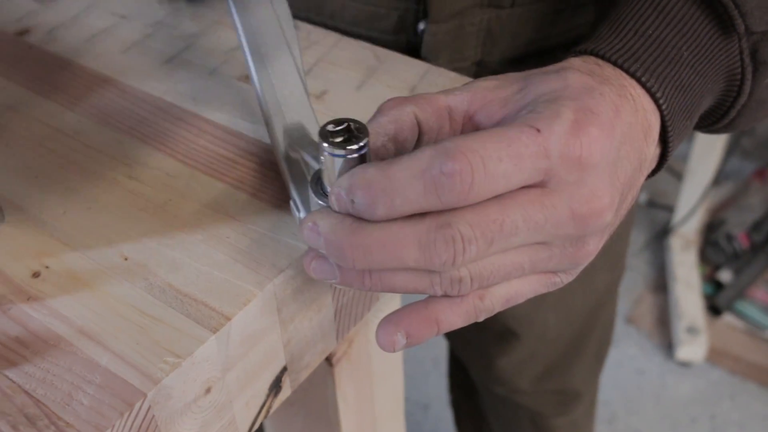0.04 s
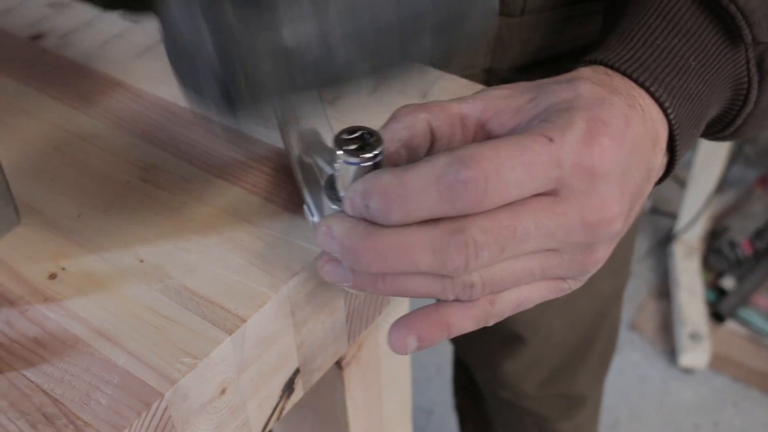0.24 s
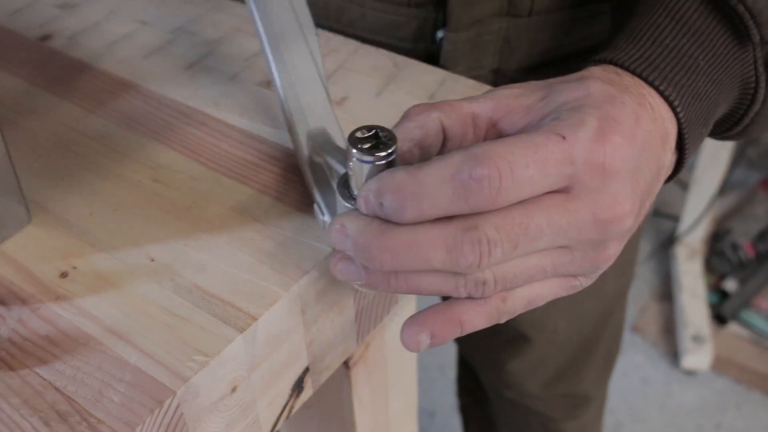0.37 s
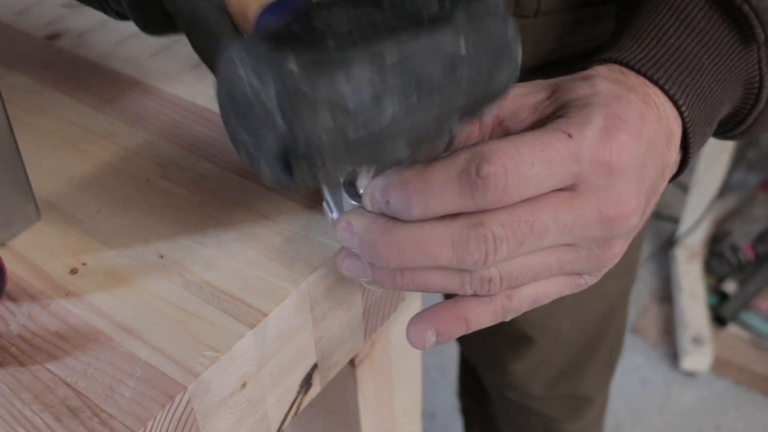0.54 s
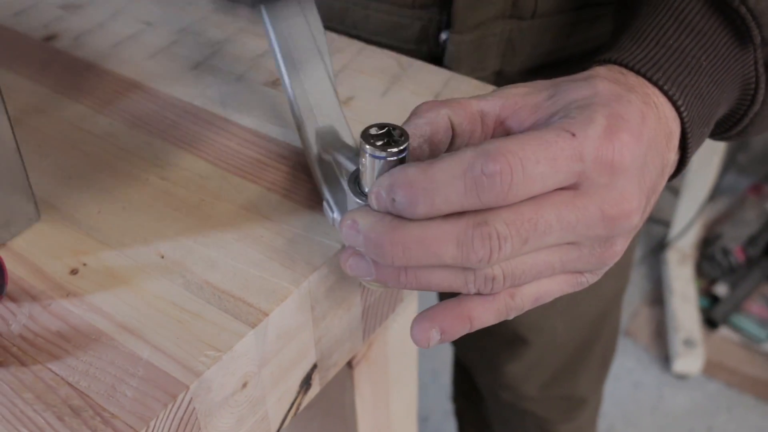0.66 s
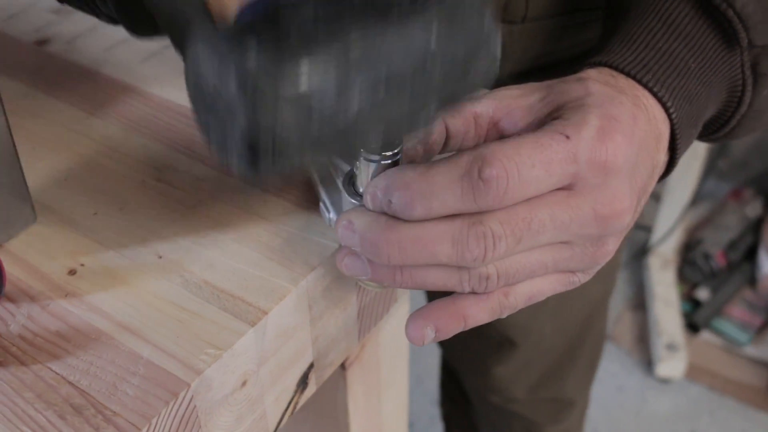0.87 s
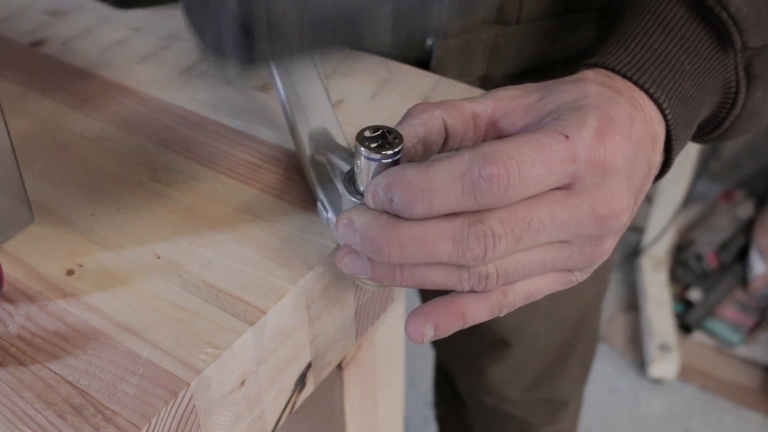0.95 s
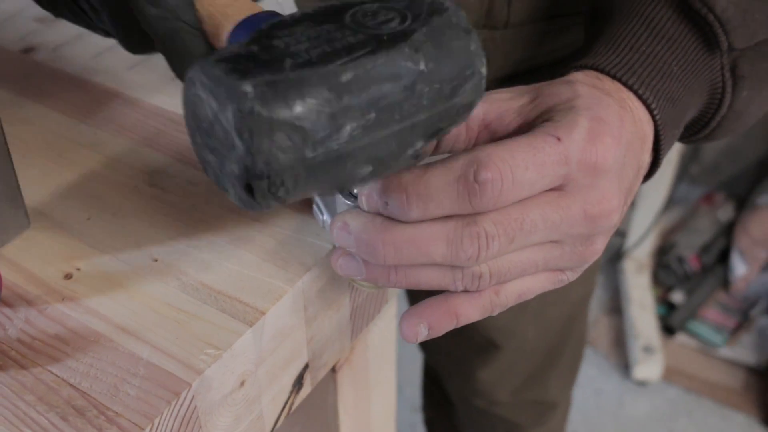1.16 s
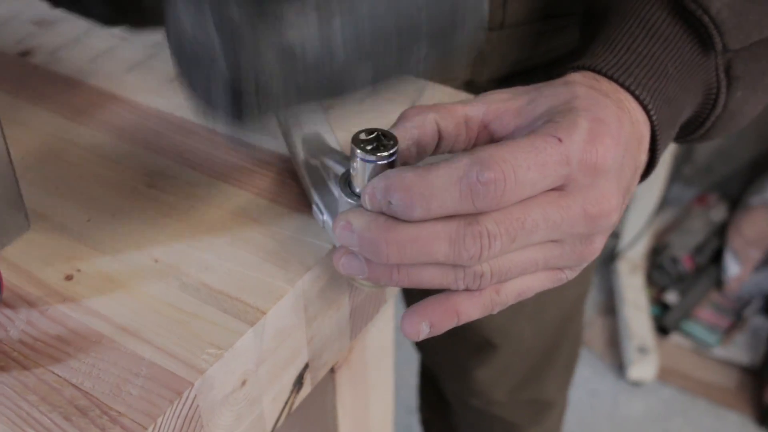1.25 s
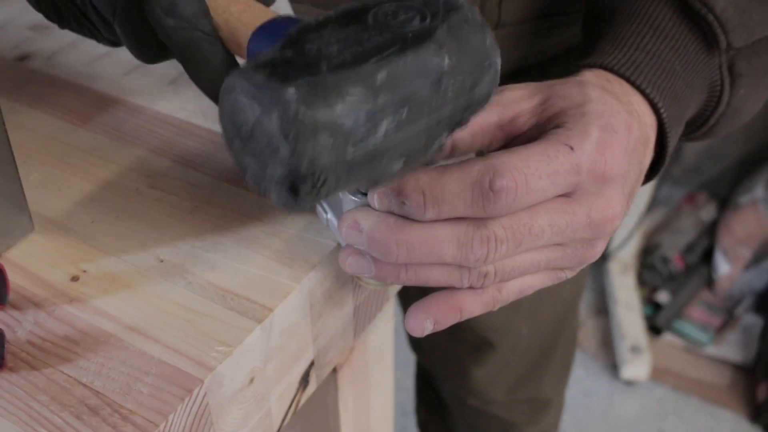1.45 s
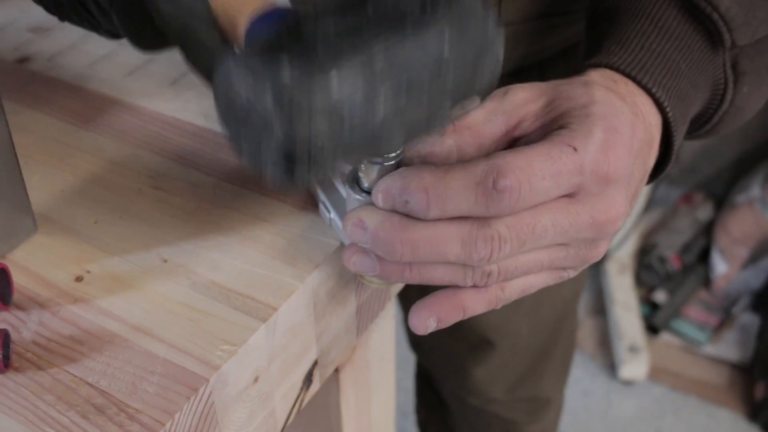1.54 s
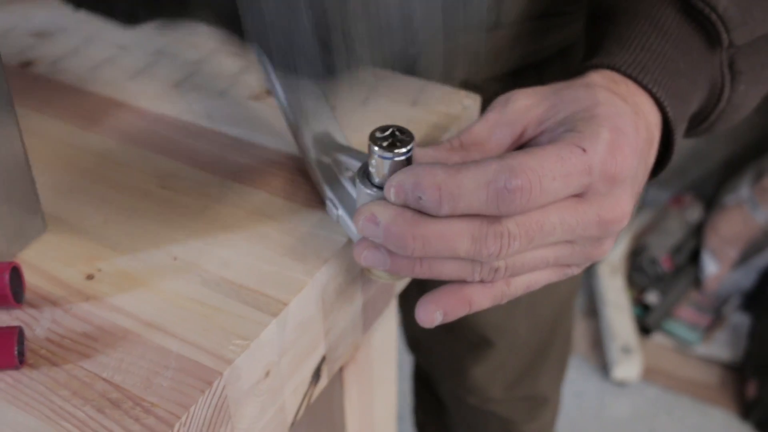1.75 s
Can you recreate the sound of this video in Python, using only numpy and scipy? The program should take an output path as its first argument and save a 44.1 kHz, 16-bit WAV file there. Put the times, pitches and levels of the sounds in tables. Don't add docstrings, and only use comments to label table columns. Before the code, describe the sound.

Rubber mallet taps on a steel socket knock a wooden workbench, with small metallic clinks, close up

```python
import sys
import numpy as np
from scipy import signal
from scipy.fft import rfft, irfft
from scipy.io import wavfile
from scipy.ndimage import map_coordinates

SR = 44100
rng = np.random.default_rng(int(sys.argv[2]) if len(sys.argv) > 2 else 0)


def unload_wav(signal):
    wavfile.write(
        sys.argv[1],
        SR,
        np.round(np.clip(np.atleast_2d(signal).T, -1, 1) * 32767).astype(np.int16),
    )


def ratio_of_db(decibels):
    return 10 ** (np.asarray(decibels, float) / 20)


N = 79380
LEAD = SR // 5
LONG = SR * 7 // 10
STEEL_RISE_S = 0.00064


def along(points, hz):
    f, value = np.transpose(points)
    return np.interp(np.log(hz + 1), np.log(f + 1), value)


def noise(points, size):
    spectrum = rfft(rng.standard_normal(size))
    x = irfft(spectrum * ratio_of_db(along(points, np.fft.rfftfreq(size, 1 / SR))), size)
    return x / x.std()


def ring(modes, rise_s, detune):
    t = np.arange(LONG) / SR
    hz, db, t60_s = np.transpose(modes)[:, :, None]
    level_luck, pitch_luck = rng.standard_normal((2, len(modes), 1))
    spread_db = 1.2
    decay = ratio_of_db(db + spread_db * level_luck - 60 * t / t60_s)
    waves = decay * np.sin(2 * np.pi * hz * (1 + detune * pitch_luck) * t)
    return -waves.sum(0) * (1 - np.exp(-t / rise_s))


def add(track, s, x):
    part = track[LEAD + round(s * SR):][:len(x)]
    part += x[:len(part)]


# (frequency [Hz], level [dB], t60 [s])
BENCH_TOP = [(116, -21, 0.45), (169.6, -18.5, .2), (257.5, 1, 0.11), (295.7, -3, 0.058), (352, -5, 0.1),
             (452.2, -4, 0.12), (611.7, -8.5, 0.14), (721.7, -6, 0.11), (890.6, -1, 0.065), (984, -2, 0.12),
             (1246, -1.5, 0.058), (1297.5, -5.5, 0.063), (1660, -6.5, 0.042), (1757, -4, 0.035)]
# (frequency [Hz], level [dB], t60 [s])
BENCH_FRAME = [(117, -36.5, 0.32), (160, -43, 0.44), (266.5, -39, .5), (352, -36.5, 0.66),
               (431.7, -34, 0.61), (538, -30, 0.51), (690, -37, 0.47), (697, -32.5, .4),
               (794.5, -28.5, 0.48), (960, -50.5, .4), (903, -24, 0.46), (996, -36.5, 1),
               (1130, -34.5, 0.23), (1196, -26, 0.37)]
# (delay [s], level [dB])
BENCH_RETURNS = [(.0035, -8.5), (.0065, -5), (.0095, -5), (.012, -7)]


def bench_knock():
    t = np.arange(LONG) / SR
    grip_s, grip_db, closing_s = 0.012, -8, 0.0023
    grip = 1 - (1 - ratio_of_db(grip_db)) * np.clip((t - grip_s) / closing_s, 0, 1)
    direct = ring(BENCH_TOP, 0.0016, 0.004)
    knock = direct.copy()
    for delay_s, db in BENCH_RETURNS:
        knock += ratio_of_db(db) * np.pad(direct, (round(delay_s * SR), 0))[:LONG]
    return grip * knock + ring(BENCH_FRAME, .01, 0.0009)


# (frequency [Hz], level [dB])
CRACK_COLOUR = [(300, -1.5), (1200, 4), (2800, 4.5), (4500, -4.5), (7500, -22), (11000, -27), (15000, -27),
                (16300, -37.5)]


def contact_crack():
    t = np.arange(LONG) / SR
    grit_db, grain = 8, 40
    bumps = rng.standard_normal(LONG // grain + 4)
    grit = ratio_of_db(grit_db * map_coordinates(bumps, [np.arange(LONG) / grain]))
    crack_t60_s, fizz_t60_s, fizz_db = 0.016, 0.04, -10.5
    fade = ratio_of_db(-60 * t / crack_t60_s) + ratio_of_db(fizz_db - 60 * t / fizz_t60_s)
    fade *= 1 - np.exp(-t / STEEL_RISE_S)
    return fade * grit * noise(CRACK_COLOUR, LONG)


def blow(bench_db, crack_db):
    return ratio_of_db(bench_db) * bench_knock() + ratio_of_db(crack_db) * contact_crack()


# (frequency [Hz], t60 [s])
SHOP_DECAY = [(100, .4), (300, 0.37), (450, 0.37), (1000, 0.43), (2200, 0.37), (4000, 0.26), (6000, 0.33),
              (14000, 0.17)]


def shop(x, air):
    level_db, delay_s = -16, 0.0049
    hz, t, z = signal.stft(air, SR, nperseg=256)
    decay = ratio_of_db(-60 * t / along(SHOP_DECAY, hz)[:, None])
    tail = signal.istft(z * decay, SR, nperseg=256)[1]
    late = np.pad(x, (round(delay_s * SR), 0))
    return ratio_of_db(level_db) * signal.fftconvolve(late, tail / np.linalg.norm(tail))


def place(track, walls, s, x, wet_db):
    same = 0.81
    air = same * walls + np.sqrt(1 - same ** 2) * rng.standard_normal(LONG)
    add(track, s, x)
    add(track, s, ratio_of_db(wet_db) * shop(x, air))


# (time [s], bench level [dB], crack level [dB])
TAPS = [
    (-.115, -8.5, -10.5),
    (0.2154, -10, -12.5),
    (0.5572, -11.5, -15.5),
    (0.8836, -12, -15.5),
    (1.204, -12, -18.5),
    (1.5308, -17.5, -20),
]


def mallet_taps(track, walls):
    for s, bench_db, crack_db in TAPS:
        place(track, walls, s, blow(bench_db, crack_db), 0)


# (frequency [Hz], level [dB], t60 [s])
ARM = [(2686, -10.5, 0.027), (3320, 2.5, 0.024), (3863, 1.5, 0.051)]
PIN = [(5206, 2.5, 0.064), (5209, -24.5, 0.18), (13800, -19, 0.021)]
SOCKET = [(3124, -1.5, .13), (4624, 1.5, 0.098), (5460, -4.5, 0.074), (6487, -13.5, 0.13)]
BUSHING = [(9900, -5.5, .012), (11040, -4, .03), (12100, -2, .012), (12700, -15.5, .04),
           (15030, -14.5, .012)]


def clink(*levels_db):
    parts = (ARM, PIN, SOCKET, BUSHING)
    return sum(ratio_of_db(db) * ring(part, STEEL_RISE_S, 0) for db, part in zip(levels_db, parts))


# (time [s], arm level [dB], pin level [dB], socket level [dB], bushing level [dB])
CLINKS = [(-.115, -29, -46, -49, -55), (.2160, -11, -18.5, -38.5, -27.5), (.2255, -30, -20, -54.5, -43),
          (.5572, -20.5, -29, -32, -24.5), (.570, -47, -56, -49.5, -41), (.587, -66, -66, -46, -50),
          (0.632, -53, -67, -67.5, -60), (0.883, -30, -42, -28.5, -43), (0.896, -47, -53, -44, -45),
          (1.2032, -27, -57, -36.5, -51.5), (1.532, -28, -47, -38, -54.5), (1.543, -22.5, -55, -39.5, -38),
          (1.589, -41, -74, -62, -71)]


def steel_clinks(track, walls):
    for s, *levels_db in CLINKS:
        place(track, walls, s, clink(*levels_db), -11.5)


# (frequency [Hz], level [dB])
AIR_COLOUR = [(12, -23), (20, 0), (86, -21), (265, -24), (439, -21.5), (990, -15), (1790, -30),
              (14700, -40.5), (16400, -60)]
# (frequency [Hz], level [dB])
DRONE = [(165, -64), (258, -67)]


def hum():
    t = np.arange(N) / SR
    background = ratio_of_db(-62.5) * noise(AIR_COLOUR, N)
    for hz, db in DRONE:
        sway = 1 + 0.4 * noise([(8, 0), (20, -40), (100, -120)], N)
        background += ratio_of_db(db) * sway * np.sin(2 * np.pi * hz * t)
    return background


# (time [s], bench level [dB], crack level [dB])
RATTLES = [
    (0.2235, -59.5, -22.5),
    (.566, -68, -42.5),
    (0.896, -40, -35),
    (1.543, -31.5, -29),
]


def loose_rattles(track, walls):
    for s, bench_db, crack_db in RATTLES:
        place(track, walls, s, blow(bench_db, crack_db), 0)


# (time [s], level [dB], swell [s])
ROD = [
    (0.236, -57, 0.089),
    (.895, -73, .03),
    (1.22, -70, .02),
    (1.55, -65.5, 0.047),
]


def rod(track):
    t = np.arange(LONG) / SR
    rod_hz, t60_s = 6990, 0.65
    for s, db, swell_s in ROD:
        swell = np.sin(np.pi / 2 * np.clip(t / swell_s, 0, 1)) ** 2
        decay = ratio_of_db(db - 60 * np.maximum(t - swell_s, 0) / t60_s)
        add(track, s, swell * decay * np.sin(2 * np.pi * rod_hz * t))


def scene():
    track = np.zeros(N + LEAD)
    walls = rng.standard_normal(LONG)
    mallet_taps(track, walls)
    steel_clinks(track, walls)
    loose_rattles(track, walls)
    rod(track)
    low_cut = signal.butter(2, 57, "high", fs=SR, output="sos")
    knocks = signal.sosfilt(low_cut, track)
    return (knocks[LEAD:] + hum())[None]


def top_cut(x):
    return signal.sosfilt(signal.butter(12, 16550, fs=SR, output="sos"), x)


def record(dry):
    treble_limit = signal.butter(10, 16200, fs=SR, output="sos")
    mix = signal.sosfilt(treble_limit, dry)
    return top_cut(mix)


dry = scene()
out = record(dry)
unload_wav(out)
```